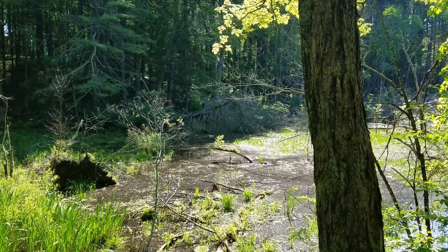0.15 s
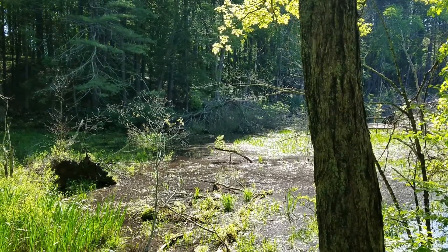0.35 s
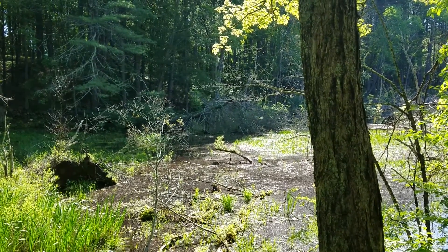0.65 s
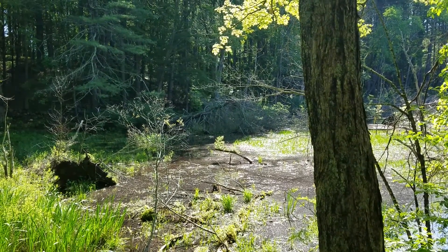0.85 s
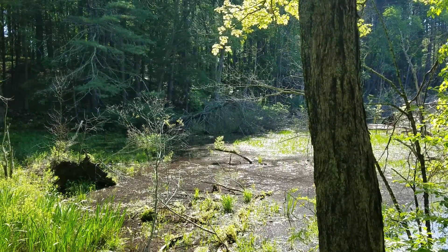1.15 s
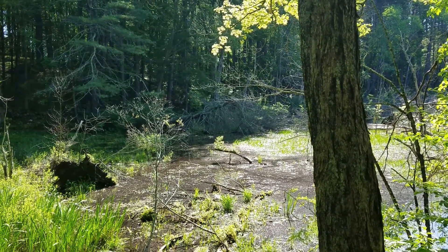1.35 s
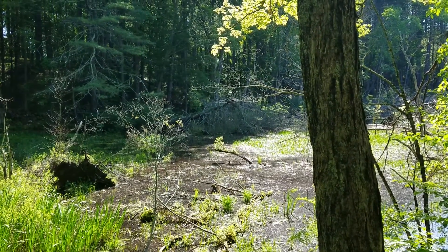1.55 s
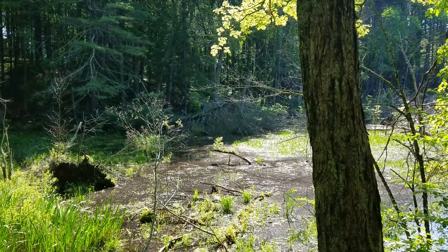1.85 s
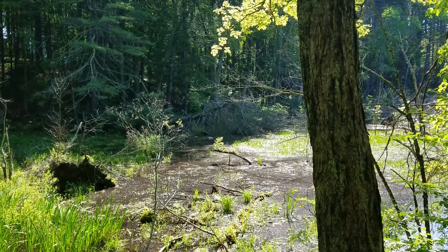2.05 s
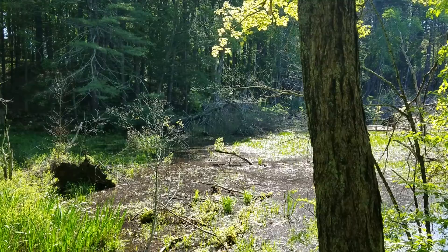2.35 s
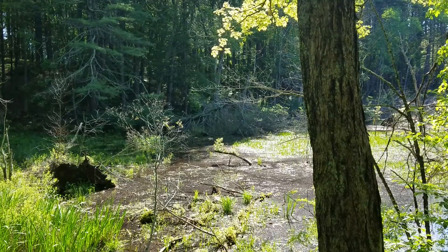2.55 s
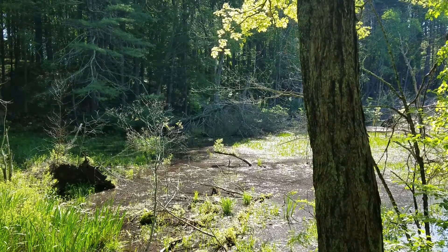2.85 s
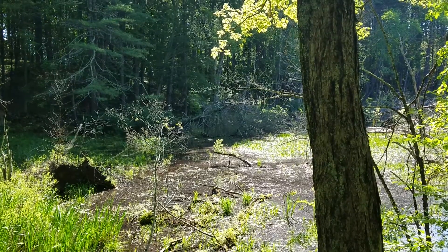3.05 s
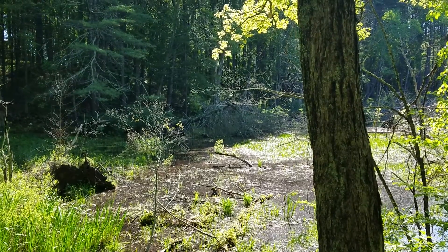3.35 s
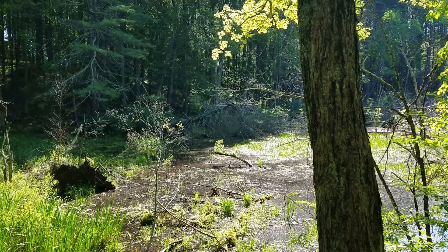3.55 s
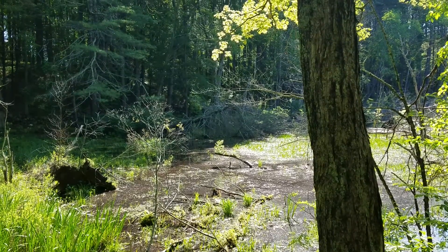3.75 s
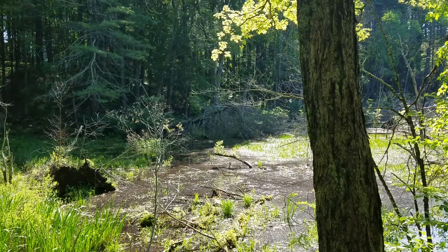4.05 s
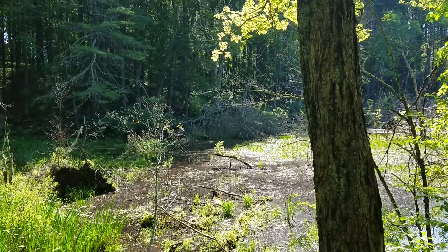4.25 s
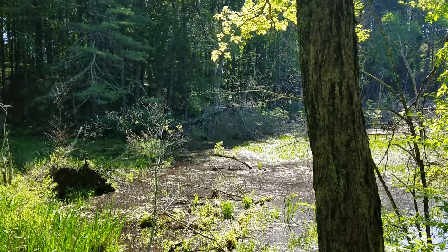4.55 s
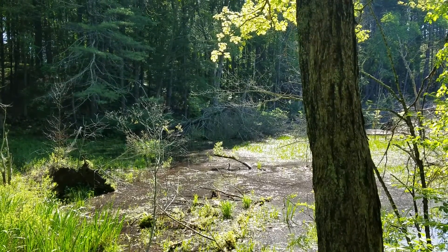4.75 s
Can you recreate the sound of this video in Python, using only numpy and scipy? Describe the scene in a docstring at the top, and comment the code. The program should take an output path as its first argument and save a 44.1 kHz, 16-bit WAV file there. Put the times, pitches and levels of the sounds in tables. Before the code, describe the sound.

Three quick, pulsing frog trills echo through swampy woods while small birds sing faintly above a soft, distant rumble.

```python
"""Frog in a woodland swamp

A frog gives three rapid trills, each pulse a short rising note reflected by the water and the trunks.
A small bird answers with a dry trill and a run of swooping phrases; others whistle farther off.
A low hum sinks slowly over a distant rumble, and near the end there is one small click."""
import sys
import numpy as np
from scipy import signal
from scipy.fft import rfft, irfft
from scipy.io import wavfile
from scipy.ndimage import uniform_filter1d

SR = 44100
rng = np.random.default_rng(int(sys.argv[2]) if len(sys.argv) > 2 else 0)


def int16_out(signal):
    """Quantize to a 16-bit WAV file."""
    q = np.round(np.clip(np.atleast_2d(signal).T, -1, 1) * 32767)
    wavfile.write(sys.argv[1], SR, q.astype(np.int16))


N = 217057
TIME = np.arange(N) / SR

# Spectra of the rumble and the hiss. Each row: frequency in Hz, relative density in dB.
RUMBLE_SPECTRUM = [(20, -36), (55, -16), (80, -6.5), (104, -0.5), (135, -1), (200, -3), (270, -1.5),
                   (320, 2), (355, 2.5), (400, -2), (480, -3.5), (700, -8), (1200, -13.5), (2500, -27)]
HISS_SPECTRUM = [(20, 0), (50, 10), (90, 5.5), (300, -5), (700, -0.5), (1300, 0), (2500, -0.5), (4500, -7),
                 (7000, -16), (10000, -30), (12500, -12.5), (15500, -11)]
# Slow growth of the rumble. Each row: time in seconds, level in dB.
RUMBLE_ENVELOPE = [(0, -64.5), (1.2, -64), (1.4, -62.5), (2.9, -60.7), (4.92, -61.5)]
# Likeness of the background at the two ears. Each row: frequency in Hz, correlation.
NOISE_CORRELATION = [(60, 0.87), (130, 0.93), (290, 0.74), (640, 0.47), (1400, 0), (15000, 0)]
# Balance of the background. Each row: frequency in Hz, left minus right in dB.
NOISE_BALANCE = [(60, -2.5), (380, -4), (700, -3), (1300, -2), (2400, 0), (15000, -1.2)]
# Sinking of the hum. Each row: time in seconds, pitch in Hz.
HUM_GLIDE = [(1, 318), (1.8, 305.5), (3.4, 299.5), (3.85, 287)]
# Swells of the hum. Each row: time in seconds, relative level in dB.
HUM_ENVELOPE = [(0.0, -70), (1.47, -70.5), (1.58, -61), (1.67, -78), (1.75, -59.5), (1.95, -75.5),
                (2.22, -59.5), (2.53, -54.5), (2.78, -65), (3.34, -61.5), (3.43, -77), (3.47, -61),
                (3.63, -71), (3.88, -66.5), (4.06, -73.5), (4.19, -49), (4.33, -62), (4.48, -55),
                (4.54, -72.5), (4.88, -58), (4.92, -71)]
# Nearer whistles. Each row: start and length in seconds, first, middle and last pitch in Hz,
# relative level in dB.
NEAR_ARCS = [(.14, .084, 4300, 4740, 4920, -67), (.835, 0.088, 4150, 4680, 4230, -60),
             (.945, 0.11, 4330, 4740, 4330, -63.5), (3.79, 0.034, 5800, 6600, 6740, -63),
             (3.878, .03, 5680, 6450, 6750, -59.5)]
# Whistles deep in the wood. Each row: start and length in seconds, middle pitch in Hz,
# slide in Hz per second, relative level in dB.
FAR_SLIDES = [(.25, 0.13, 5700, -800, -74.5), (1.19, 0.17, 3420, -500, -75), (1.451, 0.54, 3450, 596, -76),
              (1.88, 0.37, 3815, 358, -71), (3.959, 0.109, 3910, -600, -59),
              (3.993, 0.095, 3630, -2000, -61.5), (4.212, 0.135, 3812, -900, -61.5),
              (4.384, 0.21, 2770, -800, -64.5), (4.44, .16, 3390, -800, -68),
              (4.624, 0.25, 2380, -200, -61.5)]
# Far rising peeps. Each row: start in seconds, relative level in dB.
FAR_PEEPS = [(2.012, -58), (2.365, -54.5), (2.67, -55.5), (2.905, -52), (3.177, -56), (3.568, -58)]
# The bird's dry trill. Each row: time in seconds, gap between chips in seconds, relative level in dB.
DRY_TRILL = [(.514, .1285, -77), (1.03, .131, -68), (1.3, .1245, -66), (2.03, .1235, -63.5),
             (2.2, .1207, -54.5), (3.05, .1207, -50.5), (3.401, .1207, -55)]
# The bird's note shapes, in even steps of time. Each row: pitch in Hz, relative level in dB.
CHIP_SHAPE = [(8800, -9), (7000, -16), (5840, -9.5), (5090, -3.5), (4330, 1.5), (3777, 0), (2860, -8)]
SWOOP_SHAPE = [(9970, -7), (7900, -14), (5875, -7.5), (5080, 0.5), (4560, -1), (4330, -5.5), (4000, 19)]
FLICK_SHAPE = [(3300, 5.5), (3650, -1.5), (4200, 5), (4850, -5), (5400, 1.5)]
TICK_SHAPE = [(9100, -4.5), (7520, -20.5), (6630, -10), (5600, -16)]
# The frog's trills. Each row: time the first note shuts in seconds, note count, first gap, growth per
# gap and delay of the last note in seconds, softening of the first note in dB, overtone gain in dB.
FROG_TRILLS = [(1.0886, 13, .0610, .00048, .015, 10.5, -1), (2.1441, 17, .0635, .00022, .002, 2, 0),
               (3.5644, 8, .0602, .00076, 0, 0, -2)]
# Harmonics of the frog's note. Each row: harmonic number, relative level in dB, left minus right in dB,
# phase lead of the left ear in radians at a pitch of 1 kHz.
FROG_HARMONICS = [(1, -3, -3, 0.85), (2, 1.5, 1.5, 2.206), (3, -21, -3, 3.7)]


def from_db(db):
    """Amplitude grows tenfold for every 20 dB."""
    return 10 ** (np.asarray(db) / 20)


def unit_rms(x):
    """Normalisation brings the mean power to one."""
    return x / np.sqrt(np.mean(x ** 2) + 1e-20)


def in_time(rows):
    """Linear interpolation gives a curve's value at every sample."""
    return np.interp(TIME, *np.transpose(rows))


def at_hz(points, hz):
    """A spectrum is interpolated on a logarithmic frequency axis."""
    f, value = np.transpose(points)
    return np.interp(np.log(np.maximum(hz, 1)), np.log(f), value)


def pan(balance_db):
    """A level difference between the ears sets direction; positive is left."""
    return from_db(np.array([[.5], [-.5]]) * balance_db)


def add(out, s, sound):
    """Superposition: a sound joins the mix at s seconds."""
    i = max(round(s * SR), 0)
    part = sound[..., :max(N - i, 0)]
    out[..., i:i + part.shape[-1]] += part


def drift(rate_hz):
    """Low-passed noise wanders smoothly, with unit spread."""
    hz = np.arange(N // 2 + 1) * SR / N
    return unit_rms(irfft(rfft(rng.standard_normal(N)) / (1 + (hz / rate_hz) ** 4), N))


def stereo_noise(spectrum):
    """Partial coherence: the ears receive similar bass and unrelated treble."""
    hz = np.arange(N // 2 + 1) * SR / N
    mid, side = rfft(rng.standard_normal((2, N)))
    alike = at_hz(NOISE_CORRELATION, hz)
    both = np.sqrt(1 + alike) * mid + np.sqrt(1 - alike) * side * [[1], [-1]]
    return unit_rms(irfft(both * from_db(at_hz(spectrum, hz)) * pan(at_hz(NOISE_BALANCE, hz)), N))


def background(hiss_db=-67.5):
    """Independent noises add in power: a distant rumble and a faint even hiss."""
    rumble = from_db(in_time(RUMBLE_ENVELOPE)) * stereo_noise(RUMBLE_SPECTRUM)
    return rumble + from_db(hiss_db) * stereo_noise(HISS_SPECTRUM)


def wavering(hz, depth, rate_hz):
    """Random modulation in quadrature makes a tone waver in level and phase."""
    phase = 2 * np.pi * np.cumsum(hz) / SR
    in_phase = (1 + depth * drift(rate_hz)) * np.sin(phase)
    return unit_rms(in_phase + depth * drift(rate_hz) * np.cos(phase))


def hum(gain_db=-1, drone_hz=102, drone_db=-74.5, drone_start_s=1.1, drone_fade_s=.2):
    """Amplitude modulation swells and fades a sinking tone; a deeper drone enters beneath it."""
    tone = from_db(in_time(HUM_ENVELOPE) + gain_db) * wavering(in_time(HUM_GLIDE), .36, rate_hz=19.6)
    fade_in = np.clip((TIME - drone_start_s) / drone_fade_s, 0, 1)
    drone = from_db(drone_db) * fade_in * wavering(np.full(N, drone_hz), depth=1.2, rate_hz=18)
    return (tone + drone) * pan(-5)


def whistles(rows, waver_hz):
    """Frequency modulation: each note wavers about a parabola through three pitches."""
    out, waver = np.zeros(N), waver_hz * drift(rate_hz=112)
    for s, length_s, *pitches_hz, db in rows:
        u = np.linspace(0, 1, int(length_s * SR))
        arc_hz = np.polyval(np.polyfit([0, .5, 1], pitches_hz, 2), u)
        hz = arc_hz + np.roll(waver, -int(s * SR))[:len(u)]
        envelope = from_db(db) * np.sqrt(np.abs(np.sin(np.pi * u)))
        add(out, s, envelope * np.sin(2 * np.pi * np.cumsum(hz) / SR))
    return out


def woods(x, t60_s, onset_s, echoes_per_s=2500):
    """Scattering by trees: a cloud of uneven echoes builds up and decays exponentially."""
    t = TIME[:int(1.5 * SR)]
    reflections = rng.standard_normal((2, len(t))) * (rng.random((2, len(t))) < echoes_per_s / SR)
    echoes = reflections * from_db(-60 * t / t60_s) * (1 - np.exp(-t / onset_s))
    echoes /= np.sqrt(np.sum(echoes ** 2, axis=1, keepdims=True))
    return signal.fftconvolve(np.atleast_2d(x), echoes, axes=1)[:, :N]


def foliage(x):
    """Interference: very short echoes from twigs near the path break up a clean glide."""
    return .73 * x + .55 * woods(x, t60_s=.06, onset_s=.001)


def whistling_birds(peep_s=.034, peep_hz=(2300, 2630, 3480)):
    """The farther the bird, the greater the ratio of scattered to direct sound."""
    slides = [(s, length_s, hz - slide * length_s / 2, hz, hz + slide * length_s / 2, db)
              for s, length_s, hz, slide, db in FAR_SLIDES]
    peeps = [(s, peep_s, *peep_hz, db) for s, db in FAR_PEEPS]
    near = whistles(NEAR_ARCS, waver_hz=34.8)
    far = whistles(slides + peeps, waver_hz=30.4)
    scattered = woods(from_db(-7) * near + from_db(-1) * far, t60_s=1, onset_s=.0091)
    return foliage(near) + from_db(-2) * woods(far, t60_s=.046, onset_s=.0009) + scattered


def glide(shape, length_s):
    """A bird's note is a swept sine, its phase the integral of its pitch."""
    u = np.linspace(0, 1, int(length_s * SR))
    hz, db = (np.interp(u, np.linspace(0, 1, len(c)), c) for c in np.transpose(shape))
    soft_ends = np.clip(10 * np.minimum(u, 1 - u), 0, 1)
    return from_db(db) * np.sin(2 * np.pi * np.cumsum(hz) / SR) * soft_ends


def songbird(phrase_start_s=3.5975, phrase_gap_s=.2438, scatter_hz=6200):
    """Fast frequency sweeps form a crescendo of falling chips, then phrases of ticks, swoop and flick."""
    song = np.zeros(N)
    run_s, gaps_s, levels_db = np.transpose(DRY_TRILL)
    s = run_s[0]
    while s < run_s[-1]:
        add(song, s, from_db(np.interp(s, run_s, levels_db)) * glide(CHIP_SHAPE, length_s=.044))
        s += np.interp(s, run_s, gaps_s)
    for k in range(6):
        s = phrase_start_s + k * phrase_gap_s
        gain = from_db(-53.5 - 7.5 * np.exp(-k / 1.1))  # the phrases soon reach full strength
        if k:
            add(song, s - .097, gain * glide(TICK_SHAPE, length_s=.018))
            add(song, s - .072, gain * glide(TICK_SHAPE, length_s=.016))
        add(song, s, gain * glide(SWOOP_SHAPE, length_s=.041))
        add(song, s + .055, gain * glide(FLICK_SHAPE, length_s=.032))
    # the leaves reflect the middle of the song's range best
    leaves = signal.butter(1, [.78 * scatter_hz, 1.28 * scatter_hz], "band", fs=SR, output="sos")
    return foliage(song) + from_db(2.5) * woods(signal.sosfilt(leaves, song), t60_s=.85, onset_s=.0027)


def trill_notes(note_db=-30.5, uneven_db=.38, warm_up_notes=2.67, brighten_notes=.56):
    """A trill is a slowing pulse train that starts soft, round and pure and then fills out."""
    notes = []
    for start_s, count, gap_s, slowing_s, held_s, softer_db, bright_db in FROG_TRILLS:
        k = np.arange(count)
        s = start_s + gap_s * k + slowing_s * k * (k - 1) / 2 + held_s * (k == k[-1])
        level_db = note_db - softer_db * np.exp(-k / warm_up_notes) + rng.normal(0, uneven_db, count)
        purity = np.exp(-k / brighten_notes)
        overtone_db = bright_db - 6.5 - 8.5 * purity
        round_ms = 3.2 * purity
        notes += zip(s, level_db, overtone_db, round_ms)
    return notes


def frog_pulse(lead_s, overtone_db, round_ms, top_hz=1070, climb_hz_per_ms=8, rasp_hz=2700):
    """A harmonic note rises, swells and shuts abruptly; its overtones and a faint rasp flare midway."""
    ms = np.arange(-int(lead_s * SR), int(.005 * SR)) * 1000 / SR  # zero where the note shuts
    ms *= 1 + .05 * rng.normal()  # no two notes are equally long
    flip_hz = 62.5 * np.exp(ms / 3.53)  # the pitch flips up at the close
    hz = top_hz + rng.normal(0, 10.02) + climb_hz_per_ms * ms + flip_hz
    hz += 16 * unit_rms(uniform_filter1d(rng.standard_normal(len(ms)), size=60))  # slight wobble
    phase = 2 * np.pi * (np.cumsum(hz) / SR + rng.random())
    # a rounder note peaks earlier and shuts more gently
    shut = np.exp(-(np.maximum(ms + 2.48 + round_ms, 0) / (2.17 + round_ms)) ** 2)
    low_gate, high_gate = (shut * np.clip((ms + 31) / open_ms, 0, 1) for open_ms in (16.4, 3.8))
    swell = from_db(3.5 + .74 * (ms + round_ms / 2)) * low_gate
    flare = from_db(overtone_db - .72 * np.abs(ms + 9.4)) * high_gate
    partials = []
    for harmonic, db, balance_db, lead_rad in FROG_HARMONICS:
        # the frog sits to the left, so the phase gap between the ears grows with pitch
        ear_phase = np.array([[.5], [-.5]]) * lead_rad * hz / 1000
        envelope = from_db(db) * (swell if harmonic == 1 else flare)
        partials.append(envelope * pan(balance_db) * np.sin(harmonic * phase + ear_phase))
    throat = signal.butter(2, [.84 * rasp_hz, 1.25 * rasp_hz], "band", fs=SR, output="sos")
    rasp = from_db(-26) * flare * unit_rms(signal.sosfilt(throat, rng.standard_normal(len(ms))))
    return partials[0], sum(partials[1:]) + rasp


def frog(lead_s=.045, water_echo_ms=4.7):
    """Reflection: water mirrors the trills; trunks return the overtones more than the fundamental."""
    low, high = np.zeros((2, 2, N))
    for s, db, overtone_db, round_ms in trill_notes():
        fundamental, overtones = frog_pulse(lead_s, overtone_db, round_ms)
        add(low, s - lead_s, from_db(db) * fundamental)
        add(high, s - lead_s, from_db(db) * overtones)
    out = low + high
    add(out, water_echo_ms / 1000, from_db(-12) * low + from_db(-7.5) * high)
    out += from_db(-10) * woods(low, t60_s=.86, onset_s=.002)
    return out + from_db(-6.5) * woods(high, t60_s=.97, onset_s=.0013)


def click(start_s=4.8012, rise_ms=.043, decay_ms=.66, low_cut_hz=90):
    """A brief pulse has a broad spectrum: one small snap, mostly on the left."""
    out, ms = np.zeros((2, N)), 1000 * TIME[:SR // 100]
    pulse = (1 - np.exp(-ms / rise_ms)) * np.exp(-(ms / decay_ms) ** 2)
    add(out, start_s, from_db(-40) * pan(balance_db=21) * pulse)
    return signal.sosfilt(signal.butter(1, low_cut_hz, "high", fs=SR, output="sos"), out)


def scene():
    """The pressures of all the sources add at the bank."""
    return frog() + songbird() + whistling_birds() + hum() + background() + click()


def record(dry):
    """An elliptic low-pass filter cuts steeply above 15.8 kHz."""
    return signal.sosfilt(signal.ellip(12, .1, 70, 15800, fs=SR, output="sos"), dry)


dry = scene()
out = record(dry)
int16_out(out)
```